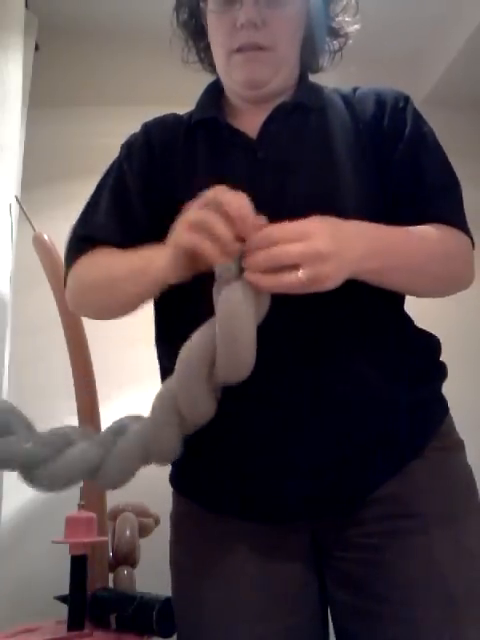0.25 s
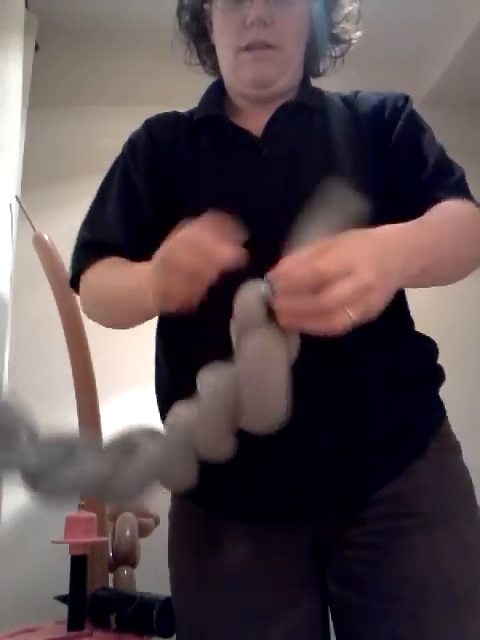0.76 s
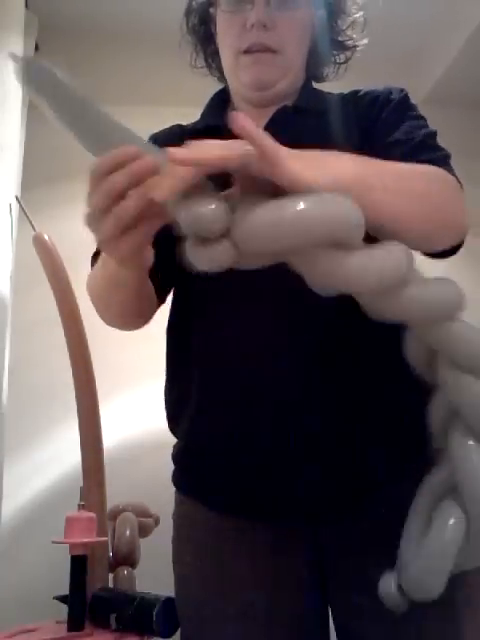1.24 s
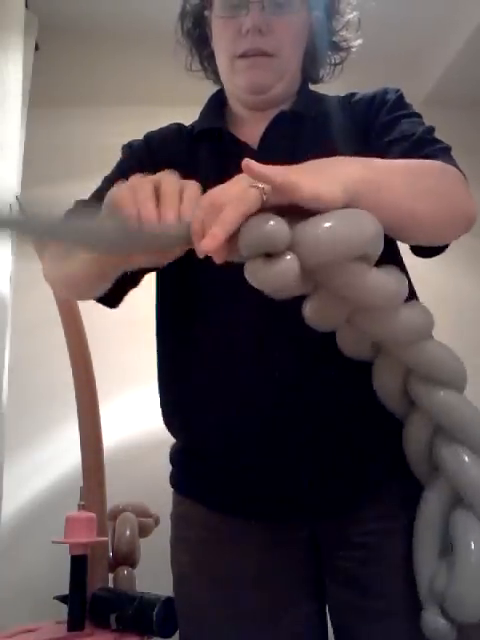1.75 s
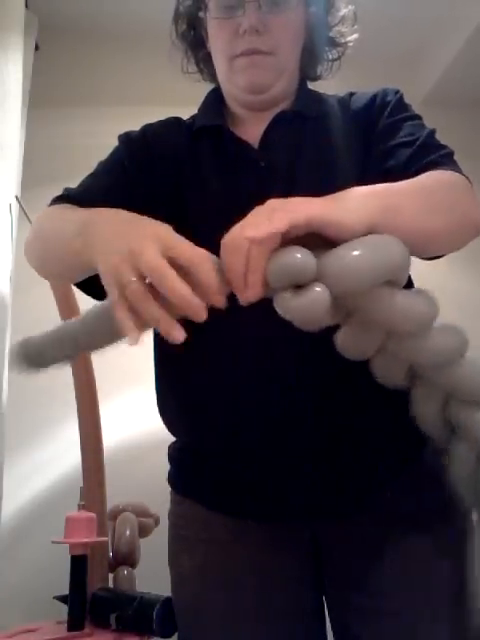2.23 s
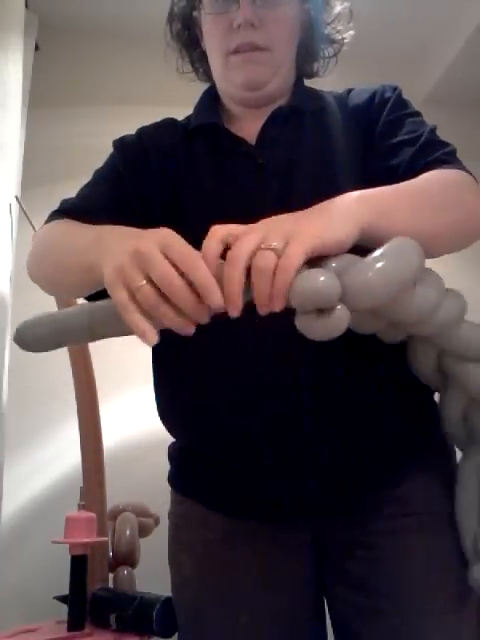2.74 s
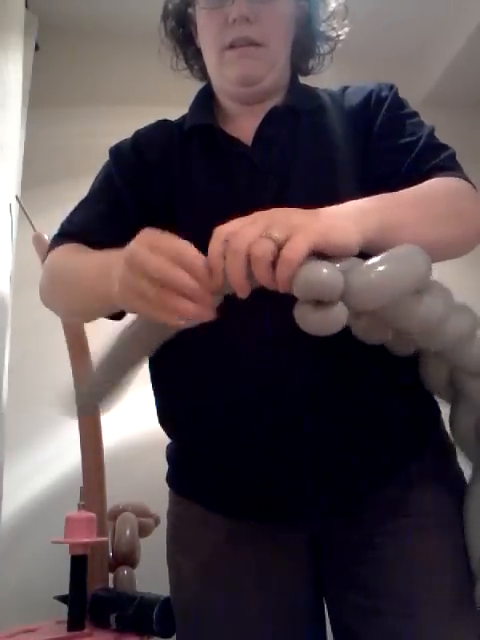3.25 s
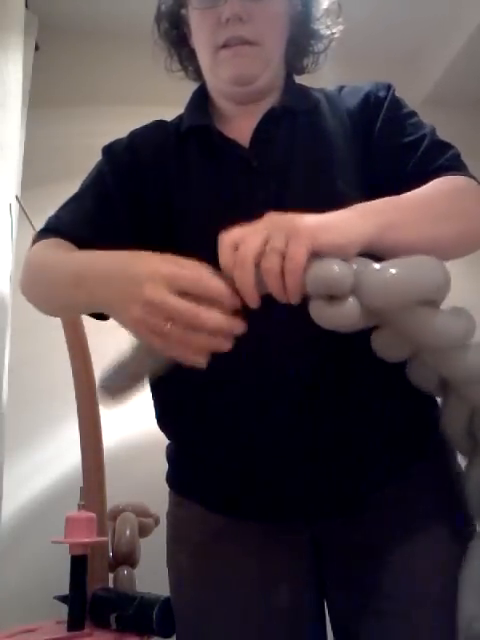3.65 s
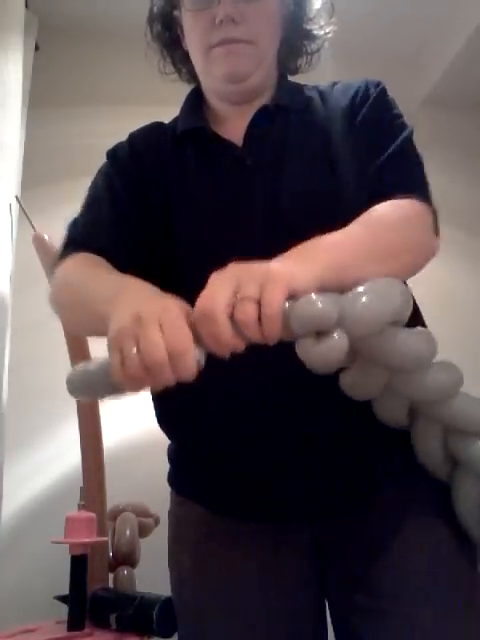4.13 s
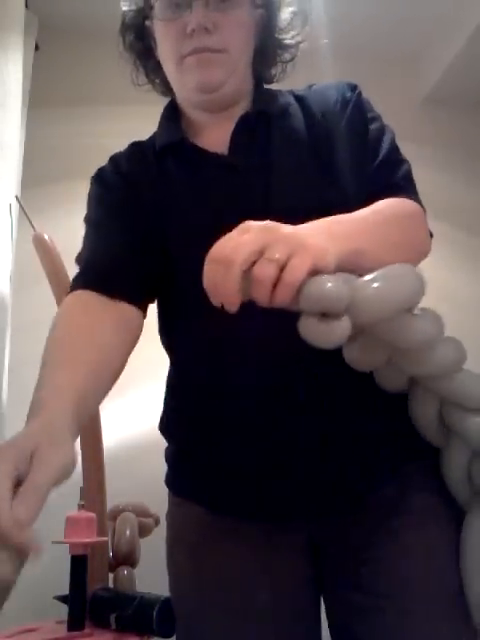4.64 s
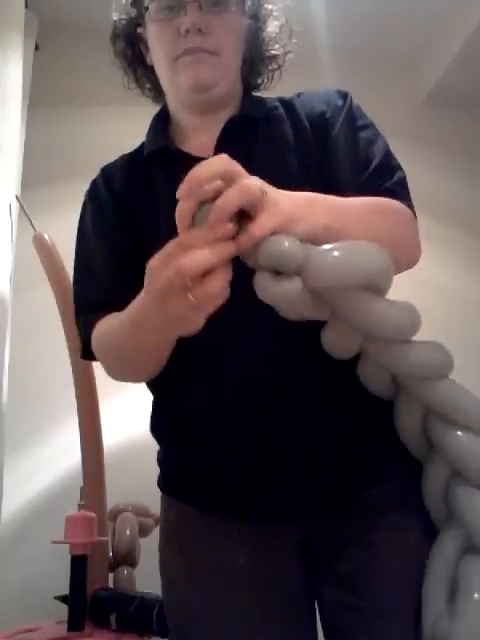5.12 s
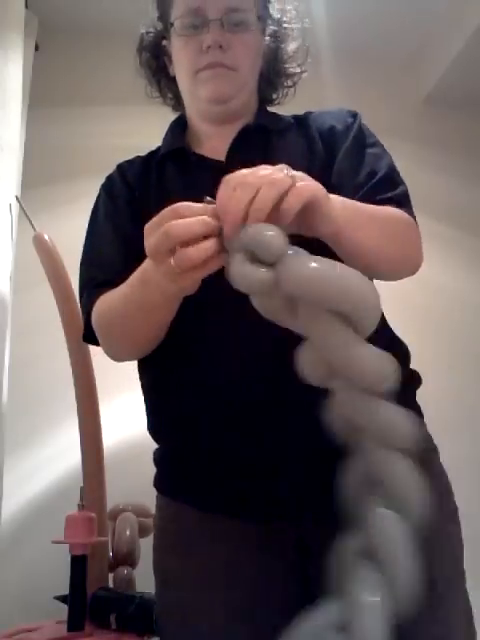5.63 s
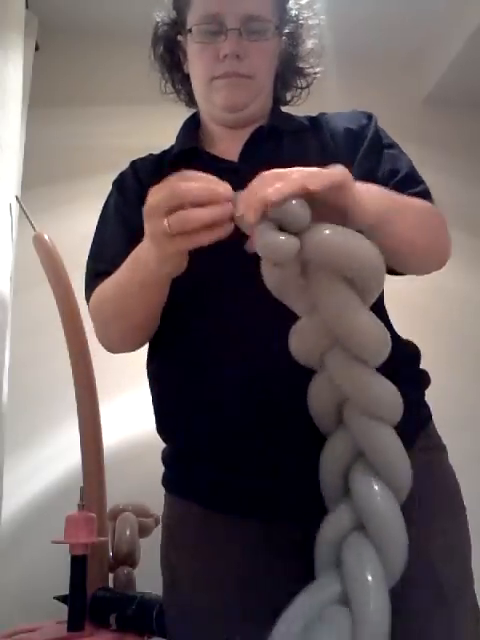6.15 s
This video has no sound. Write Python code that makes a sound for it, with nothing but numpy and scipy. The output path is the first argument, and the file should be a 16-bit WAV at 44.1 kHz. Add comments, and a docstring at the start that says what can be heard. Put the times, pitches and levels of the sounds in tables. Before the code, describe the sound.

Inflated latex balloons are twisted at close range in a small, bare room with short echoes and a very faint hush. From 0 to 0.6 s, fingers rub in two crackly strokes with several sharp snaps; hard, abrupt creaks burst at about 0.63 and 0.74 s. From 1 to 3.4 s the handling is lighter: a brief scuff and snap near 1.25, a clear snap near 2.05, soft rubbing and small low creaks. Strong creaks return at 3.5 to 3.6, with a loud snap at 3.9. At 4.42 a rough, hissy high squeal rises and fades, a tight creak hits at 4.6, and tiny gliding chirps follow until 4.75. Rubbing and quick separate creaks continue from 4.8 to 5.7, then thin into near quiet until a last stroke and snaps at 6.2 to 6.3. The narrow-band microphone cuts the top treble, and hard twists clip slightly with a low thump.

```python
"""Hands twist and knot inflated latex modelling balloons in a small room, for a little over six seconds.
From the start sliding fingers crackle finely in strokes, lone slips of the taut skin snap, and runs of
slips creak. Past four seconds the fastest slips fuse into short gliding squeals among dense creaks;
then the creaks thin out, and a last stroke and a few snaps end it. Every slip rings the skin and echoes
in the room over a faint hush. A narrow-band microphone limits the loudest twists."""
import sys
import numpy as np
from scipy import signal
from scipy.fft import rfft, irfft, next_fast_len
from scipy.io import wavfile
from scipy.ndimage import uniform_filter1d, minimum_filter1d

SR = 44100
rng = np.random.default_rng(int(sys.argv[2]) if len(sys.argv) > 2 else 0)


def transcribe(u):
    """Save the signal u as a 16-bit wav file named by the first command-line argument.

    u: samples, shape (n,) or (channels, n), limited to [-1, 1]; the rate is SR.
    q: integer samples, one column per channel.
    """
    v = np.clip(np.atleast_2d(u).T, -1, 1)
    q = np.round(v * 32767).astype(np.int16)
    wavfile.write(sys.argv[1], SR, q)


N = 281358
TIME = np.arange(N) / SR  # seconds


def gain_of(db):
    """Turns decibels into an amplitude factor."""
    return 10 ** (np.asarray(db) / 20)


def evened(x):
    """Scales a sound to rms 1."""
    return x / np.sqrt(np.mean(x ** 2) + 1e-20)


def read(points, hz):
    """Reads a table of (Hz, value) points along a log-frequency axis."""
    point_hz, value = np.transpose(points)
    return np.interp(np.log(hz + 1), np.log(point_hz + 1), value)


def add(mix, s, sound):
    """Mixes a sound in at s seconds, cut off at the end of the mix."""
    part = mix[max(round(s * SR), 0):][:len(sound)]
    part += sound[:len(part)]


def coloured(x, points, size=4096):
    """Shapes the spectrum with a causal minimum-phase filter, so attacks stay sharp."""
    hz = abs(np.fft.fftfreq(size, 1 / SR))
    log_gain = np.log(gain_of(read(points, hz)))
    # the Hilbert transform of the log gain gives the minimum phase
    taps = np.fft.ifft(np.exp(np.conj(signal.hilbert(log_gain)))).real
    return signal.oaconvolve(x, taps[:size // 2])[:len(x)]


def wander(hz):
    """Smooth random curve of rms 1 whose changes fade out above hz."""
    size = next_fast_len(N)
    f = np.fft.rfftfreq(size, 1 / SR)
    spectrum = rfft(rng.standard_normal(size)) / (1 + (f / hz) ** 4)
    return evened(irfft(spectrum, size)[:N])


def skin(x, hz, q):
    """The patch of latex that a slip lets go is a heavily damped resonator, ringing for a cycle or two."""
    b, a = signal.iirpeak(min(hz, SR / 5), max(q, .5), fs=SR)
    return signal.lfilter(b, a, x)


# Spectrum of the still room. Each row: frequency in Hz, relative density in dB per Hz.
HUSH_SPECTRUM = [(25, 2), (100, -13.5), (300, -8.5), (1000, -40.5), (6500, -19)]


def still_room(level_db=-58):
    """The hush of the still room is steady noise with a fixed spectrum."""
    return gain_of(level_db) * evened(coloured(rng.standard_normal(N), HUSH_SPECTRUM))


# Decay of the room tail. Each row: frequency in Hz, time to fall by 60 dB in seconds.
ROOM_DECAY = [(200, 0.33), (550, 0.21), (7000, 0.3)]


def echoes(early_db=-3, early_s=0.0036, tail_db=-2.0, build_s=0.0094, size=15360, step_count=12):
    """Quick echoes come from the balloons, arms and body, then the tail from a small bare room."""
    t = np.arange(size) / SR
    # sparse echoes of random sign, on average one in step_count samples
    sign = rng.choice([-1., 1.], (2, size))
    taps = sign * (rng.random((2, size)) < 1 / step_count)
    early = taps[0] * np.exp(-t / early_s) * (t > .0007)
    # the tail builds up, then each frequency dies at its own pace
    hz, at, bands = signal.stft(taps[1] * np.minimum(t / build_s, 1), SR, nperseg=256)
    decay = gain_of(-60 * at / read(ROOM_DECAY, hz)[:, None])
    tail = signal.istft(bands * decay, SR, nperseg=256)[1][:size]
    early = gain_of(early_db) * early / np.linalg.norm(early)
    return early + gain_of(tail_db) * tail / np.linalg.norm(tail)


def room(x, size=4096):
    """The balloon keeps turning, so each stretch of sound meets a fresh set of echo paths."""
    fade = np.sin(np.pi * np.arange(size) / size)
    padded, wet = np.pad(x, size), np.zeros(N + 2 * size)
    for start in range(0, N + size, size // 2):
        stretch = padded[start:start + size] * fade
        add(wet, start / SR, signal.fftconvolve(stretch, echoes()))
    return x + wet[size:size + N]


# Strokes of the fingers along the latex.
# Each row: start in seconds, length in seconds, relative level in dB, extra bass in dB.
STROKES = [(-.02, 0.28, -30.5, 1.5), (0.325, 0.3, -27.5, -2.5), (1.269, 0.023, -21.5, 3.5),
           (1.544, 0.18, -40, 3.5), (1.803, 0.21, -37.5, -8), (2.304, 0.4, -31.5, 5),
           (2.785, .29, -35, 7.5), (3.205, 0.23, -33, -2.5), (3.516, 0.15, -24, -5),
           (3.787, 0.12, -29, -27), (4.317, 0.22, -50, 11), (4.768, 0.41, -31.5, 3),
           (5.292, 0.43, -30.5, 2), (6.226, 0.19, -39.5, 0)]


def sliding(bass, grip_s=0.009, let_go_s=0.057, holding_db=-45.5):
    """How hard the fingers rub, in the bass or above it: each stroke builds, holds and dies away."""
    power = gain_of(holding_db) ** 2  # hands that only hold still crackle faintly
    for s, length, db, bass_db in STROKES:
        t = np.maximum(TIME - s, 0)
        build = 1 - np.exp(-t / grip_s)
        release = np.exp(-np.maximum(t - length, 0) / let_go_s)
        power = power + (gain_of(db + bass * bass_db) * build * release) ** 2
    return np.sqrt(power)


# Tone of the rubbing. Each row: frequency in Hz, gain in dB.
RUB_COLOUR = [(100, 5.5), (300, -4), (650, 0.5), (1400, 6), (3000, 4.5), (6000, 2)]


def rubbing(level_db=-4, clump_db=1.5, clump_hz=35, q=1.01, bass_hz=480):
    """Tiny slips in clumps under the fingers, each on a patch of skin with its own pitch."""
    grains_per_s, spread_db = 280, 5  # per patch
    shift_db, shift_hz = 2.5, 9
    grains = np.zeros(N)
    for ring_hz in np.geomspace(650, 6000, num=7):
        size = gain_of(spread_db * np.minimum(rng.exponential(1, N), 4))
        slips = size * rng.choice([-1, 1], N) * (rng.random(N) < grains_per_s / SR)
        contact = gain_of(shift_db * wander(shift_hz))  # the fingers roll from patch to patch
        grains += contact * skin(slips, ring_hz, q) / np.sqrt(ring_hz)
    grip = gain_of(clump_db * wander(clump_hz))
    crackle = gain_of(level_db) * evened(coloured(grains, RUB_COLOUR) * grip)
    # bass and treble follow the strokes at separate levels
    low = signal.sosfiltfilt(signal.butter(2, bass_hz, fs=SR, output="sos"), crackle)
    return low * sliding(bass=True) + (crackle - low) * sliding(bass=False)


# Squeals. Each row: start in seconds, length in seconds, relative level in dB, first pitch in Hz,
# pitch it glides towards in Hz, roughness from 0 to 1.
SQUEALS = [(4.422, .13, -9, 4985, 6200, 0.9), (4.66, 0.016, -14, 3420, 4150, 0.2),
           (4.696, .033, -14, 4090, 3540, 0.07), (4.729, 0.0197, -18.5, 3320, 4710, 0.3)]


def squeals(level_db=-2, hiss_db=-3, hiss_q=1.0, octave_db=-11):
    """Slips so fast that they fuse into a gliding, fading whistle; a rough one wavers and hisses."""
    edge_s, fade_db_per_s = 0.0025, 117
    glide_share = 0.22  # time constant of the glide, as a share of the length
    out = np.zeros(N)
    drift, flutter_db = .05 * wander(170), 6 * wander(260)
    for s, length, db, first_hz, last_hz, rough in SQUEALS:
        on = (TIME >= s) & (TIME < s + length)
        t = TIME[on] - s
        hz = last_hz + (first_hz - last_hz) * np.exp(-t / (glide_share * length))
        edges = np.minimum(np.minimum(t, length - t) / edge_s, 1)
        swell = edges * gain_of(db - fade_db_per_s * t)
        phase = 2 * np.pi * np.cumsum(hz * (1 + rough * drift[on])) / SR
        tone = np.sin(phase) + gain_of(octave_db) * np.sin(2 * phase)
        hiss = evened(skin(rng.standard_normal(N), hz.mean(), hiss_q))[on]
        flutter = gain_of(level_db + rough * flutter_db[on])
        out[on] += swell * flutter * (tone + rough * gain_of(hiss_db) * hiss)
    return out


# Lone slips. Each row: start in seconds, relative peak in dB, ring of the skin in Hz.
SNAPS = [(0.072, -9, 1830), (0.202, -6.5, 1270), (0.25, -10.5, 3150), (0.506, -6.5, 1840),
         (0.739, -7, 2900), (1.251, -11.5, 1720), (1.539, -19.5, 1270), (1.556, -20, 1260),
         (1.937, -11, 1270), (1.948, -14, 1100), (1.97, -18, 5000), (2.055, -7, 1800), (2.323, -15.5, 1970),
         (2.366, -16.5, 1810), (2.816, -19.5, 2050), (2.981, -10.5, 1810), (3.917, -4.5, 1860),
         (3.94, -12.5, 3480), (4.118, -26.5, 1800), (4.317, -21, 5280), (5.174, -9.5, 1730),
         (5.988, -27, 5960), (6.047, -17, 3940), (6.118, -19.5, 1130), (6.209, -13, 2000),
         (6.225, -7, 1970), (6.33, -14, 1970)]


def snaps(q=1.0, level_db=-2.0, chatter=0.48, chatter_s=0.00083, size=900):
    """One sharp release of the skin, then a little chatter as it grips again."""
    out, t = np.zeros(N), np.arange(size) / SR
    for s, db, ring_hz in SNAPS:
        push = chatter * rng.standard_normal(size) * np.exp(-t / chatter_s)
        push[0] = 1
        snap = skin(push, ring_hz, q)
        add(out, s, gain_of(db + level_db) * snap / abs(snap).max())
    return out


def slip_rate(db, length):
    """Typical slips per second: the harder the twist, the faster, but a brief run never gets up to speed."""
    top_hz, full_force_db, halving_db = 1533.5, -9.5, 11
    run_up_s = .009  # shorter runs slip more slowly
    return top_hz * 2 ** (min(db - full_force_db, 0) / halving_db) * min(length / run_up_s, 1)


# Runs of slips. Each row: start in seconds, length in seconds, relative level in dB,
# unevenness from 0 to 1, central ring of the skin in Hz.
CREAKS = [ (0.073, 0.025, -21.5, 0.7, 2000), (0.413, 0.0096, -12, 0.37, 2310),
          (.629, 0.018, -5.5, 0.21, 1620), (0.642, .019, -6, 0.59, 2370), (0.741, 0.015, -5, 0.41, 1660),
          (.942, 0.0087, -28.5, 0.83, 600), (1.033, 0.044, -33, 0.52, 770),
          (1.073, 0.0065, -17.5, 0.24, 2780), (1.286, 0.022, -17, 0.43, 1300),
          (1.61, 0.021, -30.5, 0.62, 1500), (1.691, 0.0058, -31.5, 0.01, 1070),
          (1.773, .014, -36, 0.33, 1770), (2.061, 0.0056, -21.5, 0.53, 2500),
          (2.111, 0.0068, -25, 0.29, 1580), (2.257, .015, -35, 0.45, 1360),
          (2.486, 0.046, -22.5, 0.56, 3600), (2.661, 0.033, -26.5, 0.58, 850),
          (3.028, 0.035, -27.5, 0.57, 1790), (3.311, 0.015, -25, 0.35, 2400),
          (3.354, 0.0079, -20.5, 0.52, 2400), (3.4876, 0.013, -10.5, 0.24, 1900),
          (3.53, 0.047, -21, 0.28, 1620), (3.575, 0.013, -7, 0.28, 1540), (3.651, 0.049, -23, 0.31, 1250),
          (3.862, 0.032, -21.5, 0.27, 2260), (4.415, 0.0056, -26.5, 0.43, 1830),
          (4.422, 0.035, -10.5, 0.77, 3420), (4.5916, 0.012, -5.5, 0.12, 2430),
          (4.628, 0.03, -31, .15, 620), (4.795, 0.025, -21.5, 0.6, 1340), (4.951, 0.0034, -22, 0, 1630),
          (4.972, 0.0048, -12, 0.51, 1980), (4.992, 0.0067, -11.5, 0.45, 1610),
          (5.0563, 0.0061, -13, 0.42, 2100), (5.0814, 0.0057, -11, 0.34, 1840),
          (5.232, .019, -19.5, 0.3, 1740), (5.301, 0.021, -15, 0.71, 3060), (5.354, 0.0059, -18, .4, 3700),
          (5.408, 0.0088, -16, 0.37, 1500), (5.534, 0.0083, -15.5, 0.18, 1960),
          (5.562, 0.0096, -14.5, 0.2, 1510), (5.663, 0.03, -13, 0.34, 1620),
          (6.212, 0.014, -25, 0.37, 1300)]


def creaks(level_db=-2, sag=0.12, size_db=5, arch=0.07, scatter=1.0, tail_count=300):
    """Stick and slip: a train of releases that swells, then slows and weakens as the tension runs out."""
    q, crack = 1.7, .07  # crack: the bare click beside the ring
    out, blow = np.zeros(N), signal.unit_impulse(tail_count)
    for s, length, db, uneven, ring_hz in CREAKS:
        rate = slip_rate(db, length)
        # the grip changes gradually, so neighbouring slips are alike and the pitch bends
        gap, size, patch = signal.lfilter([.75], [1, -.65], rng.standard_normal((3, 256)))
        done = np.minimum(np.arange(len(gap)) / (rate * length), 1)
        waits = np.exp(uneven * gap + sag * (done - .5)) / rate
        at = np.cumsum(waits) - waits[0]
        force = gain_of(size_db * uneven * size) * (1 + arch * np.sin(np.pi * done))
        pitch = ring_hz * np.exp(scatter * uneven * patch)  # uneven runs free patches of all sizes
        run = np.zeros(int(length * SR) + tail_count)
        for k in np.flatnonzero(at < length):
            ring = skin(blow, pitch[k], q) * np.sqrt(ring_hz / pitch[k])
            add(run, at[k], force[k] * (ring + crack * blow))
        # the level is the rms over the run's length
        add(out, s, gain_of(db) * run * np.sqrt(length * SR / np.sum(run ** 2)))
    return gain_of(level_db) * out


# Tone of the balloon as the microphone hears it. Each row: frequency in Hz, gain in dB.
BALLOON_BODY = [(30, -5.5), (120, 2), (300, 5), (600, 4.5), (1100, -0.5), (1900, 1), (2700, -2), (4200, 2),
                (6200, 6), (7200, 2.5)]


def scene():
    """All the slips sound through the balloon into the room, over its hush."""
    slips = rubbing() + squeals() + snaps() + creaks()
    latex = coloured(slips, BALLOON_BODY)
    return (room(latex) + still_room())[None]


# Response of the narrow-band microphone. Each row: frequency in Hz, gain in dB.
MIC_RESPONSE = [(6900, 3.5), (7300, -0.5), (7900, -18), (8700, -21.5), (9400, -75)]


def record(dry, lopsided=0.041, thump=0.16, thump_hz=340, size=120):
    """Loud twists overload a narrow-band microphone into a low thump; then a fast limiter and clipped tips."""
    ceiling, clip_at, edge_hz = .81, .73, 16200
    overload = np.minimum(dry[0] ** 2, 2)
    thump_band = signal.butter(1, [thump_hz / 3, thump_hz], "band", fs=SR, output="sos")
    low = signal.sosfilt(thump_band, overload)
    x = coloured(dry[0] + lopsided * overload + thump * low, MIC_RESPONSE)
    # the limiter holds the lowest gain nearby, then smooths it twice
    allowed = ceiling / np.maximum(abs(x), ceiling)
    held = minimum_filter1d(allowed, size)
    x = x * uniform_filter1d(uniform_filter1d(held, size // 2), size // 2)
    x = np.clip(x, -clip_at, clip_at)
    lowpass = signal.firwin(511, edge_hz, window=("kaiser", 9), fs=SR)
    return signal.oaconvolve(x, lowpass, "same")[None]


dry = scene()
out = record(dry)
transcribe(out)
```